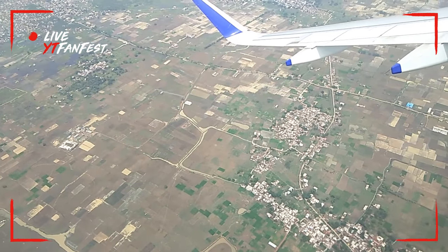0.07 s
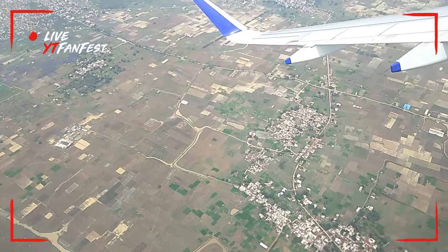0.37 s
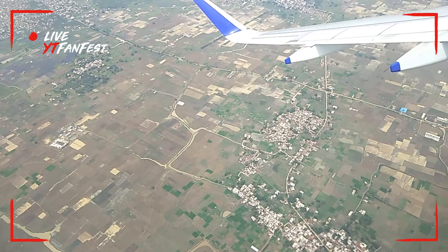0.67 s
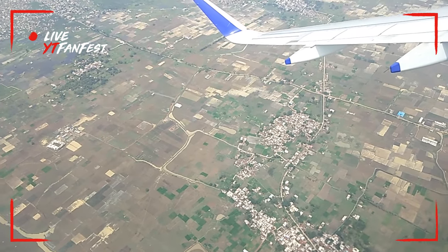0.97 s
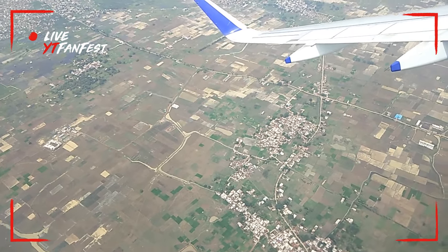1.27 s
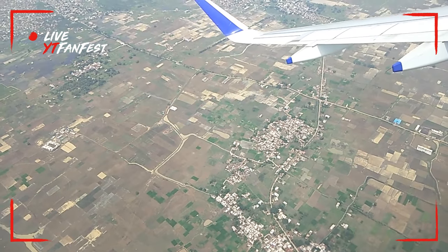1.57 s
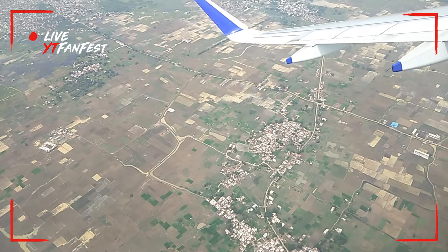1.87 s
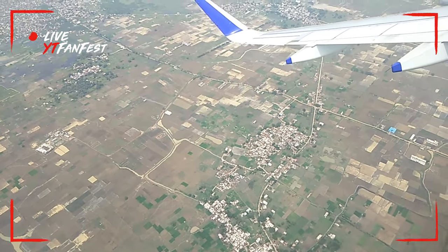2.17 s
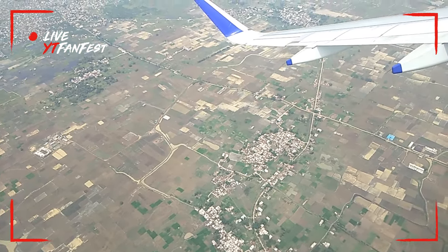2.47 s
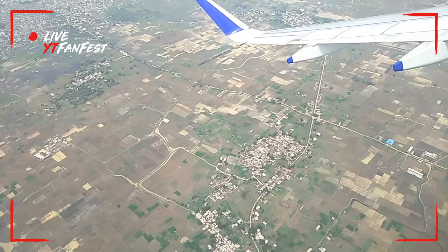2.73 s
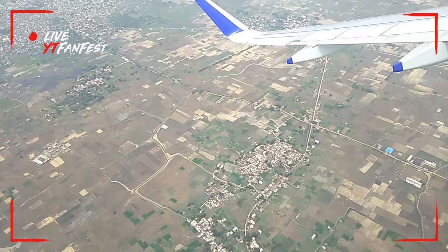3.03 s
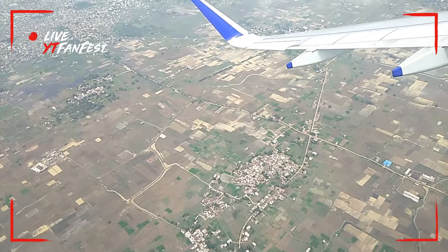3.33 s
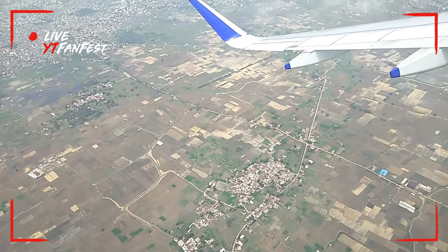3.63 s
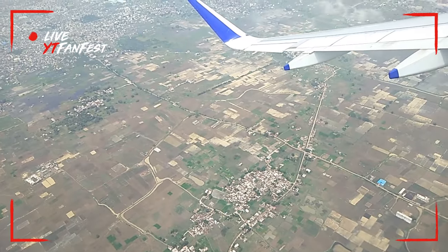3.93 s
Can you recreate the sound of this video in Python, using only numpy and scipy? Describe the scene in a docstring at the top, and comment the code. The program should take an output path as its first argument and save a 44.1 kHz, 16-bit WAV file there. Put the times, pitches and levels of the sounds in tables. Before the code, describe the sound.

An airliner cabin roars steadily in flight, with a thin whine and faint plastic ticks.

```python
"""A jet airliner in flight, one microphone at a window seat. From the start, engines and air rushing along
the fuselage fill the cabin with a steady low roar; a thin fan whine and the ventilation hiss sit on top.
All along, plastic trim ticks faintly; now and then something brushes softly, and twice there is a faint,
brief puff of very high hiss. Near the end a low drone swells, throbbing as the two engines beat."""
import sys
import numpy as np
from scipy import signal
from scipy.fft import rfft, irfft
from scipy.io import wavfile

SR = 44100
rng = np.random.default_rng(int(sys.argv[2]) if len(sys.argv) > 2 else 0)


def materialize(psi):
    """Save the field psi as 16-bit PCM at rate SR to the path in sys.argv[1].

    A 1-D psi becomes a single channel; in a 2-D psi each row is a channel.
    """
    bounded = np.clip(np.atleast_2d(psi).T, -1, 1)
    quanta = np.round(bounded * 32767).astype(np.int16)
    wavfile.write(sys.argv[1], SR, quanta)


N = 176400

# Tone colours at the seat. Each row: frequency in Hz, relative level in dB per Hz.
VENT_COLOUR = [(1000, -5), (3000, 0), (4000, 0), (5100, -2.5), (6500, -2), (7100, -8.5), (7800, -8),
               (8300, -3.5), (9100, -8.5), (10500, -8), (11500, -11.5), (12700, -25.5), (15500, -25.5)]
SOFT_HISS_COLOUR = [(2000, -7), (4000, 3.5), (6300, 1), (7200, -2), (8300, -0.5), (10500, -6), (12500, -16),
                    (15500, -18)]
HIGH_HISS_COLOUR = [(7000, -20.5), (11000, -3), (13000, -2.5), (15500, 0)]  # thin, mostly above 11 kHz
TICK_COLOUR = [(700, -1), (1400, 10), (2300, 6), (3200, 1), (5000, -2), (6400, 2.5), (7200, -11), (8300, 3),
               (9200, -11), (11000, -11), (13000, -25), (15500, -27)]
SNAP_COLOUR = [(5000, -29.5), (8500, -1.5), (12000, -5), (15000, -0.5)]  # bright edge of a crisp tick
RUSH_COLOUR = [(200, -13), (560, 2), (650, 1), (850, -0.5), (1000, 1), (1100, -1.5), (1200, -6.5),
               (1300, -5.5), (1600, -9.5), (2100, -13), (2600, -22), (3200, -29.5), (5000, -52)]
ROAR_COLOUR = [(20, -23), (40, -21), (46, -16), (53, -5.5), (68, -5.3), (90, -4.5), (130, 1), (165, -1),
               (200, -1), (280, -1.8), (315, -6.3), (338, -6.8), (375, -12.7), (430, -19.5), (490, -21),
               (540, -28), (700, -41), (1200, -80)]
# Short swells of hiss: faint puffs of very high hiss at 1.72 and 3.79 s, soft brushing at the other times.
# Each row: middle in seconds, length in seconds, soft hiss level in dB, high hiss level in dB.
HISS_SWELLS = [(.27, .25, -65, -75), (1.72, .06, -70, -69), (2.22, .27, -60.5, -69),
               (2.67, .14, -60.5, -78), (3.41, .18, -64, -79), (3.79, .12, -65, -71)]
# The clearest trim ticks. Each row: start in seconds, level in dB, bright edge in dB relative to that.
CLEAR_TICKS = [(0.1126, -40.5, -28), (0.1278, -42.5, -32), (0.1858, -43, -35), (0.2176, -42, -8),
               (0.223, -37, -17), (0.5651, -41, -10), (0.8503, -45, -35), (0.9861, -40.5, -34),
               (1.0156, -42.5, -37), (1.2303, -35, -31), (1.4167, -38.5, -28), (1.6056, -40, -30),
               (1.8042, -40, -37), (1.9131, -43, -37), (1.957, -44, -33), (2.0152, -41.5, -33),
               (2.1818, -42, -34), (2.345, -40, -26), (2.8733, -44, -35), (2.9088, -40.5, -34.5),
               (3.1147, -44, -33), (3.2865, -44, -33), (3.3187, -41, -32), (3.4418, -42, -32),
               (3.4523, -44, -34.5), (3.5395, -40.5, -35), (3.5952, -43, -28), (3.6264, -43.5, -33),
               (3.7216, -45.5, -16), (3.7767, -45, -27)]
# Swell of the engine drone. Each row: time in seconds, level in dB before the throb is added.
DRONE_SWELL = [(0, -34), (2.65, -31), (2.8, -22), (3.2, -22), (3.45, -20.7), (3.87, -20.7), (4, -27.5)]
# Fan whine. Each row: multiple of the fan's pitch, level in dB, roughness from 0 to 1.
WHINE_PARTIALS = [(1, -46.5, .48), (2, -55, .5), (3, -67.7, .55)]
# Faint hums of other rotating parts. Each row: frequency in Hz, level in dB.
ROTOR_HUMS = [(548.2, -48.5), (1009, -57)]
# The nearly steady roar. Each row: time in seconds, level in dB.
ROAR_LEVEL = [(0, -16), (1.1, -15.5), (2.5, -15.5), (2.85, -15.5), (3.15, -14.5), (3.5, -15.5), (4, -16)]
# Panel and cabin resonances. Each row: frequency in Hz, width in Hz, level in dB.
CABIN_RESONANCES = [(55.2, 7.7, -34.5), (397.4, 6.5, -43), (568, 22, -53.5), (742.7, 56, -43),
                    (1008, 46, -56), (2487, 75, -67)]


def from_db(db):
    """Decibels to gain."""
    return 10 ** (np.asarray(db) / 20)


def unit_rms(x):
    """Scale to an rms of 1."""
    return x / np.sqrt(np.mean(x ** 2) + 1e-20)


def curve(rows):
    """Join rows of time in seconds and value with straight lines."""
    return np.interp(np.arange(N) / SR, *np.transpose(rows))


def noise(colour):
    """Noise with a given tone colour; rms 1."""
    hz, db = np.transpose(colour)
    bins_hz = np.maximum(np.arange(N // 2 + 1) * SR / N, 1)
    gain = from_db(np.interp(np.log(bins_hz), np.log(hz), db))
    return unit_rms(irfft(rfft(rng.standard_normal(N)) * gain, N))


def narrow_noise(hz, width_hz):
    """Noise twice through one resonance; at 0 Hz, a random drift; rms 1."""
    bins_hz = np.arange(N // 2 + 1) * SR / N
    detuning = (bins_hz - hz) / (width_hz * 2 / np.pi)
    return unit_rms(irfft(rfft(rng.standard_normal(N)) / (1 + detuning ** 2), N))


def wavering_tone(hz, width_hz, rough):
    """A sine, part of it scattered by turbulence into a narrow band; rms 1."""
    clean = np.sqrt(2) * np.sin(2 * np.pi * (hz * np.arange(N) / SR + rng.random()))
    return np.sqrt(1 - rough ** 2) * clean + rough * narrow_noise(hz, width_hz)


def decay(power, t60_s):
    """Each impulse of power dies away exponentially, by 60 dB in t60_s."""
    feedback = from_db(-60 / (t60_s * SR)) ** 2
    return signal.lfilter([1], [1, -feedback], power + 1e-18)


def brushing_and_puffs():
    """Grainy hiss swells and fades: soft brushing, and two faint, brief puffs of very high hiss."""
    t = np.arange(N) / SR
    soft_hiss, high_hiss = noise(SOFT_HISS_COLOUR), noise(HIGH_HISS_COLOUR)
    grain_db = 3 * narrow_noise(0, width_hz=90)
    hiss = np.zeros(N)
    for middle_s, length_s, soft_db, high_db in HISS_SWELLS:
        swell = np.cos(np.pi * np.clip((t - middle_s) / length_s, -.5, .5))
        hiss += swell * (from_db(soft_db) * soft_hiss + from_db(high_db) * high_hiss)
    return unit_rms(from_db(grain_db)) * hiss


def ventilation(level_db=-58.8, flicker_db=.7):
    """Air from the vents: a faint hiss that flickers slightly."""
    return from_db(level_db + flicker_db * narrow_noise(0, width_hz=23)) * noise(VENT_COLOUR)


def trim_ticks(small_per_s=45, attack_s=.00025, echo_s=.019, echo_db=-12.5):
    """Plastic trim ticks around the seat: clear ticks, some with a bright edge, among many small ones."""
    small_ticks = rng.random(N) < small_per_s / SR
    small_db = -50 + 1.8 * rng.standard_normal(N)
    power = small_ticks * from_db(small_db) ** 2
    edge_power = np.zeros(N)
    for start_s, db, edge_db in CLEAR_TICKS:
        power[int(start_s * SR)] += from_db(db) ** 2
        edge_power[int(start_s * SR)] += from_db(db + edge_db) ** 2
    rise = np.exp(-1 / (attack_s * SR))
    power = signal.lfilter([1 - rise], [1, -rise], power + 1e-18)  # softens each onset
    power += from_db(echo_db) ** 2 * np.pad(power, (int(echo_s * SR), 0))[:N]  # once across the cabin
    tail_power = from_db(-10) ** 2 * decay(power, t60_s=.034)
    body = np.sqrt(decay(power, t60_s=.013) + tail_power) * noise(TICK_COLOUR)
    snap = np.sqrt(decay(edge_power, t60_s=.013)) * noise(SNAP_COLOUR)
    return from_db(-1.3) * body + from_db(1) * snap


def rotor_hums():
    """Rotating parts hum faintly, each at its own steady pitch."""
    return sum(from_db(db) * wavering_tone(hz, width_hz=9, rough=.4) for hz, db in ROTOR_HUMS)


def fan_whine(pitch_hz=927.2, width_hz=22):
    """The engine fan's thin, steady whine, its partials roughened by turbulence."""
    return sum(from_db(db) * wavering_tone(multiple * pitch_hz, multiple * width_hz, rough)
               for multiple, db, rough in WHINE_PARTIALS)


def engine_drone(beat_hz=3.424, crest_s=3.13, depth_db=5):
    """A low drone from outside swells near the end and throbs as the two engines beat."""
    throb_db = depth_db * np.cos(2 * np.pi * beat_hz * (np.arange(N) / SR - crest_s))
    return from_db(curve(DRONE_SWELL) + throb_db) * wavering_tone(hz=215.3, width_hz=12, rough=.25)


def airflow(rush_db=-38):
    """Low roar through the wall beside the seat, air rushing along the skin, and resonances it excites."""
    roar_db = curve(ROAR_LEVEL)
    roar = from_db(roar_db) * noise(ROAR_COLOUR)
    swing_db = .5 * (roar_db - roar_db.mean())  # the rush follows half of the roar's swing
    flicker_db = .5 * narrow_noise(0, width_hz=22)
    rush = from_db(rush_db + swing_db + flicker_db) * noise(RUSH_COLOUR)
    ringing = sum(from_db(db) * narrow_noise(hz, width_hz) for hz, width_hz, db in CABIN_RESONANCES)
    return roar + rush + ringing


def scene():
    """The cabin from the window seat, in mono."""
    roar_and_engines = airflow() + engine_drone() + fan_whine() + rotor_hums()
    return (roar_and_engines + ventilation() + trim_ticks() + brushing_and_puffs())[None]


def record(dry):
    """The microphone's signal, cut steeply above 15.5 kHz."""
    return signal.sosfilt(signal.ellip(10, .1, 80, 15500, fs=SR, output="sos"), dry)


dry = scene()
out = record(dry)
materialize(out)
```